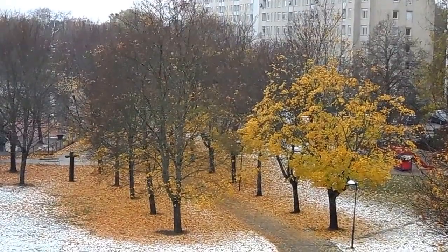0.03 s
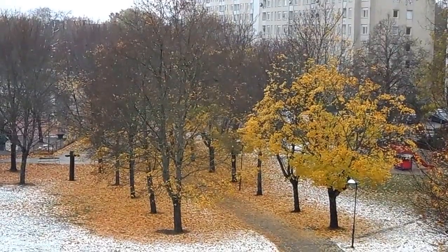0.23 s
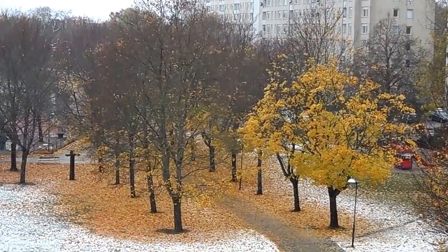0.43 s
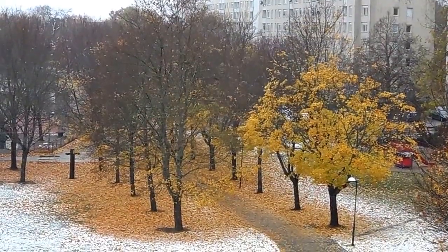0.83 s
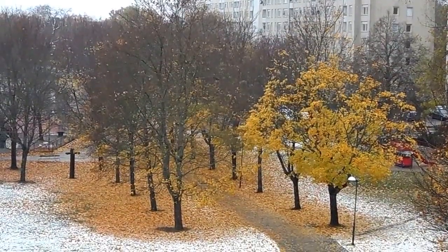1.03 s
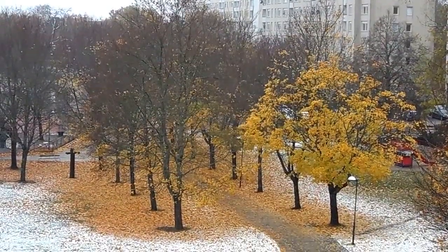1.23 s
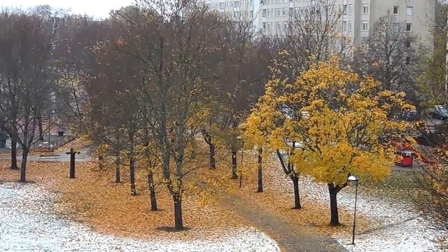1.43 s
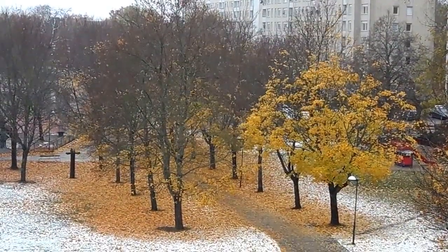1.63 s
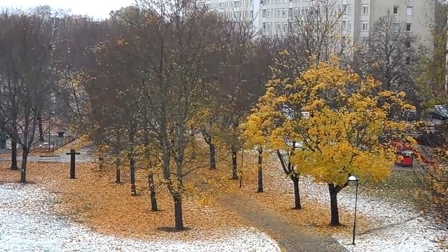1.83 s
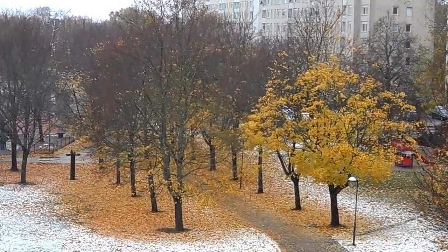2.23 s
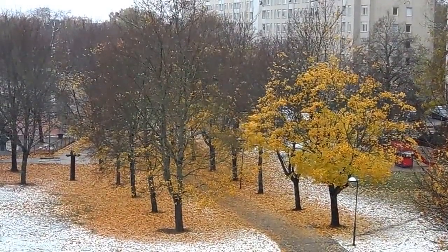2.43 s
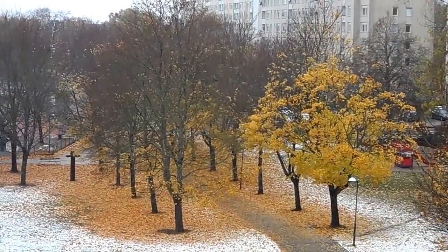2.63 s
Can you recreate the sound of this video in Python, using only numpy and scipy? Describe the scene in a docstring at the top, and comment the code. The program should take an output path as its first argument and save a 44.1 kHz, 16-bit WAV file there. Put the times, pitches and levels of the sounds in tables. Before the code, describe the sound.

Wind gusts rumble on the microphone, with faint leaf hiss and distant traffic hum.

```python
"""Wind in a quiet autumn park

Two gusts buffet the microphone: a low rumble broken by single eddies, the hardest of which
splutter up into the midrange. Further off, dry leaves hiss in the trees and distant traffic
hums; this background swells in over the first second. The recorder's noise suppression,
drawn as a set curve, dulls the leaves' treble at first and then slowly opens it."""
import sys
import numpy as np
from scipy import signal
from scipy.fft import rfft, irfft, next_fast_len
from scipy.io import wavfile
from scipy.ndimage import uniform_filter1d

SR = 44100
rng = np.random.default_rng(int(sys.argv[2]) if len(sys.argv) > 2 else 0)


def store_wav(level_fs):
    """Save 16-bit WAV to argv[1]."""
    pcm = np.round(np.clip(np.atleast_2d(level_fs), -1, 1) * 32767)
    wavfile.write(sys.argv[1], SR, pcm.T.astype(np.int16))


N = 123479
TIME = np.arange(N) / SR


def from_db(db):
    """Decibels to gain."""
    return 10 ** (np.asarray(db) / 20)


def unit_rms(x):
    """Scale to an rms of 1."""
    return x / np.sqrt(np.mean(x ** 2) + 1e-20)


def in_time(rows):
    """Read a (time_s, value) curve at every sample."""
    return np.interp(TIME, *np.transpose(rows))


def at_hz(spectrum, hz):
    """Read a (frequency_hz, level_db) spectrum on a log-frequency axis."""
    freqs, levels = np.transpose(spectrum)
    return np.interp(np.log(hz), np.log(freqs), levels)


def drift(rate_hz):
    """Smooth random wander with a spread of 1."""
    hop, run_in = 40, 2000
    pole = np.exp(-2 * np.pi * rate_hz * hop / SR)
    noise = rng.standard_normal(N // hop + run_in + 2)
    slow = signal.lfilter([1], [1, -2 * pole, pole * pole], noise)[run_in:]
    return np.interp(np.arange(N) / hop, np.arange(len(slow)), unit_rms(slow))


def noise_bands(spectrum, count):
    """Coloured noise split into overlapping bands: a list of (centre_hz, signal)."""
    size = next_fast_len(N)
    hz = np.maximum(np.fft.rfftfreq(size, 1 / SR), 1)
    centres = np.geomspace(16, 16000, count)
    noise = rfft(rng.standard_normal(size)) * from_db(at_hz(spectrum, hz))
    band_position = np.log(hz / centres[0]) / np.log(centres[1] / centres[0])
    return [(centre, irfft(noise * np.maximum(1 - abs(band_position - k), 0), size)[:N])
            for k, centre in enumerate(centres)]


def wavering_noise(spectrum, waver_db, rate_hz):
    """Noise whose bands each waver on their own; rms 1."""
    bands = noise_bands(spectrum, count=24)
    return unit_rms(sum(band * from_db(waver_db * drift(rate_hz)) for _, band in bands))


def highpass(x, hz):
    """Gentle first-order low cut."""
    return signal.sosfilt(signal.butter(1, hz, "high", fs=SR, output="sos"), x)


def wind_rumble(reference_db=-29, octaves_per_db=0.0806):
    """Turbulence right on the microphone: a stronger flow is louder and shifts the spectrum upward."""
    # rumble of the passing gusts: time_s, level_db
    flow = [(0, -31), (.11, -38), (.19, -24.5), (.38, -27), (.47, -24.5), (.57, -31.5), (.66, -29.5),
            (.73, -27), (.87, -33.5), (1.1, -41.5), (1.22, -34.5), (1.38, -43.5), (1.55, -41.5),
            (1.85, -49), (2.0, -33), (2.1, -39.5), (2.2, -36.5), (2.4, -31.5), (2.5, -33.5), (2.8, -40.5)]
    # its spectrum at the reference level: frequency_hz, density_db
    colour = [(15, -3), (30, 6.5), (60, -4.5), (110, -6.5), (170, -12), (240, -17.5), (350, -27),
              (700, -45), (1500, -53), (3000, -108)]
    flow_db = in_time(flow)
    flutter_db = 2.5 * drift(rate_hz=20.5)
    shift = 2 ** (octaves_per_db * (flow_db + flutter_db - reference_db))
    air = sum(band * from_db(flutter_db + at_hz(colour, hz / shift) - at_hz(colour, hz))
              for hz, band in noise_bands(colour, count=16))
    running_power = uniform_filter1d(uniform_filter1d(air ** 2, size=2600), size=1800)
    return from_db(flow_db) * air / np.sqrt(running_power + 1e-20)


def eddies(size=8192):
    """Each eddy is a short, spluttering swell of pressure; the microphone's port dulls them all."""
    # eddies that hit the microphone: centre_s, level_db, length_s, upper_edge_hz
    hits = [(.137, -20.5, 0.011, 159), (0.168, -33.5, 0.01, 600), (0.189, -23, 0.0083, 390),
            (.219, -28, 0.0056, 1590), (0.229, -30.5, 0.011, 432), (0.255, -23, 0.0074, 1010),
            (.259, -19, 0.0011, 2360), (.268, -28, 0.0056, 1540), (.283, -28, .006, 810),
            (.294, -21, 0.005, 200), (.305, -29, 0.0031, 750), (0.329, -36.5, 0.0028, 1090),
            (.364, -36, 0.011, 637), (0.438, -30, 0.0047, 500), (0.459, -19, 0.032, 53.3),
            (.463, -22.5, 0.0043, 596), (0.494, -18.5, 0.0048, 920), (0.504, -20.5, 0.01, 383),
            (0.527, -25, 0.02, 242), (.6, -28.5, 0.022, 265), (0.632, -27.5, 0.013, 950),
            (0.659, -25.5, 0.023, 293), (0.686, -15.5, 0.0031, 850), (0.701, -25.5, 0.014, 530),
            (0.717, -23.5, 0.016, 88), (0.759, -33, 0.02, 326), (0.832, -31.5, 0.018, 487),
            (0.911, -36.5, 0.021, 556), (0.937, -38.5, 0.015, 577), (0.958, -30, 0.014, 164),
            (1.178, -30.5, 0.018, 104), (1.25, -24, 0.015, 125), (1.96, -30.5, 0.0085, 169),
            (2.025, -22, 0.031, 173), (2.155, -18.5, .014, 136), (2.177, -20, 0.0061, 320),
            (2.21, -29, 0.019, 230), (2.275, -38, 0.022, 332), (2.316, -31.5, 0.0058, 237),
            (2.355, -26, 0.026, 124), (2.401, -31, 0.02, 207), (2.432, -33.5, 0.014, 330),
            (2.528, -23, .01, 88)]
    low_hz, knee_hz, port_hz = 25.3, 333, 2290
    hz = np.fft.rfftfreq(size, 1 / SR)
    port = hz / np.hypot(hz, low_hz) / np.hypot(1, hz / knee_hz) / np.hypot(1, (hz / port_hz) ** 6)
    t = (np.arange(size) - size / 2) / SR
    out = np.zeros(N + 2 * size)
    noise = rng.standard_normal(len(out))
    splutter_db = 3.5 * drift(rate_hz=80)
    pressure = noise * np.pad(from_db(splutter_db), size)
    for centre_s, level_db, length_s, edge_hz in hits:
        start = int(centre_s * SR) + size // 2
        swell = pressure[start:start + size] * np.exp(-2 * (t / length_s) ** 2)
        puff = irfft(rfft(swell) * port / np.hypot(1, (hz / edge_hz) ** 3.2))
        # the level holds over the eddy's own length
        out[start:start + size] += from_db(level_db) * unit_rms(puff) * np.sqrt(length_s * SR / size)
    return out[size:size + N]


def buffet_ticks(decay_s=0.0002):
    """Tiny bright cracks at the microphone on top of the hardest buffets."""
    # bursts of noise, ahead of the low cut: start_s, peak_db
    ticks = [(.2535, -52), (.435, -55), (.467, -43)]
    envelope = sum(from_db(peak_db) * (TIME >= start_s) * np.exp(-abs(TIME - start_s) / decay_s)
                   for start_s, peak_db in ticks)
    return highpass(envelope * rng.standard_normal(N) + 1e-18, hz=2500)


def leaves():
    """Far leaves hiss with the breeze; the recorder's noise suppression dulls, then opens the treble."""
    # spectrum of dry leaves: frequency_hz, density_db
    colour = [(700, -9.5), (1500, 6), (2200, 3), (3000, 2), (4200, 1.5), (5500, 0), (6800, -3.5),
              (7900, -9.5), (9500, -8.5), (11400, -7.5)]
    # hiss of the breeze in the trees: time_s, level_db
    breeze = [(0, -91), (.2, -72.5), (.4, -70), (.67, -67), (.69, -56.5), (.85, -61.5), (.96, -52),
              (1.02, -61), (1.12, -55), (1.24, -60), (1.5, -58), (1.68, -59.5), (1.82, -54), (2.0, -51),
              (2.27, -58.5), (2.55, -60), (2.8, -62)]
    # set curve of the noise suppression on the treble: time_s, gain_db
    recorder_treble_opening = [(0, -8), (.7, -12), (.9, -1), (1.5, -3.5), (1.9, 2.5), (2.8, 4)]
    hiss = wavering_noise(colour, waver_db=1.77, rate_hz=9.4)
    treble_change = highpass(hiss, hz=7000) * (from_db(in_time(recorder_treble_opening)) - 1)
    return from_db(in_time(breeze)) * (hiss + treble_change)


def traffic():
    """Far roads merge into a wash with a crest of tyre noise near 950 Hz and a few faint hums."""
    # spectrum of distant tyres and engines: frequency_hz, density_db
    colour = [(60, 2), (150, -5.5), (300, -3.5), (500, -6), (700, -3.5), (820, -1.5), (950, 2),
              (1040, -1.5), (1150, -10), (1400, -10), (1800, -8.5), (2300, -14), (3000, -22.5), (6000, -28)]
    # the wash as it reaches the park: time_s, level_db
    swell = [(0, -65.5), (.4, -58), (.8, -52), (1.1, -49.5), (1.6, -51), (2.0, -45.5), (2.4, -46.5),
             (2.8, -46.5)]
    # narrow hums in the traffic: pitch_hz, level_against_wash_db
    hum_bands = [(232, -14), (420, -22.5), (890, -10.5), (1020, -14.5), (1238, -23.5), (1482, -21.5),
                 (1935, -31.5), (2088, -23.5)]
    wash = wavering_noise(colour, waver_db=2.42, rate_hz=2.9)
    hums = sum(from_db(level_db) * hum(pitch_hz) for pitch_hz, level_db in hum_bands)
    return from_db(in_time(swell)) * (wash + hums)


def hum(pitch_hz, width_hz=20):
    """One hum of the far traffic: a narrow band of noise; rms 1."""
    radius = np.exp(-np.pi * width_hz / SR)
    resonance = [1, -2 * radius * np.cos(2 * np.pi * pitch_hz / SR), radius * radius]
    return unit_rms(signal.lfilter([1, 0, -1], resonance, rng.standard_normal(N)))


def scene():
    """One microphone in the park: wind right on it, trees and roads in the distance."""
    background = traffic() + leaves()
    return (background + wind_rumble() + eddies() + buffet_ticks())[None]


def record(dry, cutoff_hz=15700):
    """The microphone rolls off the treble and the recorder cuts the top."""
    # treble response of the microphone: frequency_hz, gain_db
    roll_off = [(11400, 0), (12600, -7.5), (14000, -13.5), (15600, -17)]
    size = next_fast_len(N + SR)
    response = from_db(at_hz(roll_off, np.fft.rfftfreq(size, 1 / SR) + 1))
    dulled = irfft(rfft(dry, size) * response, size)[:, :N]
    return signal.sosfilt(signal.ellip(12, .1, 90, cutoff_hz, fs=SR, output="sos"), dulled)


dry = scene()
out = record(dry)
store_wav(out)
```